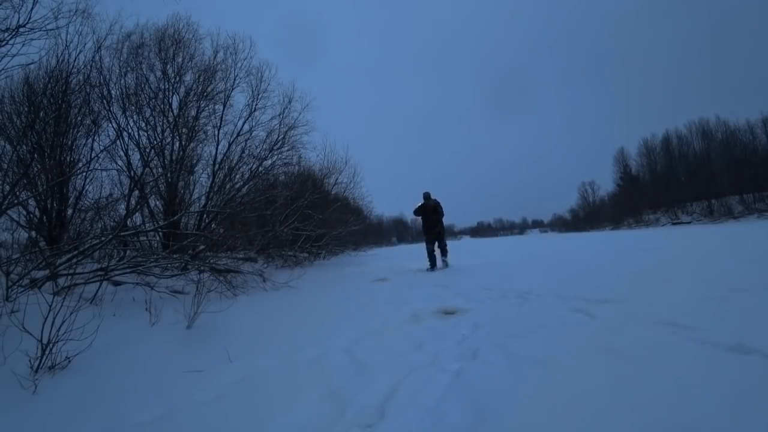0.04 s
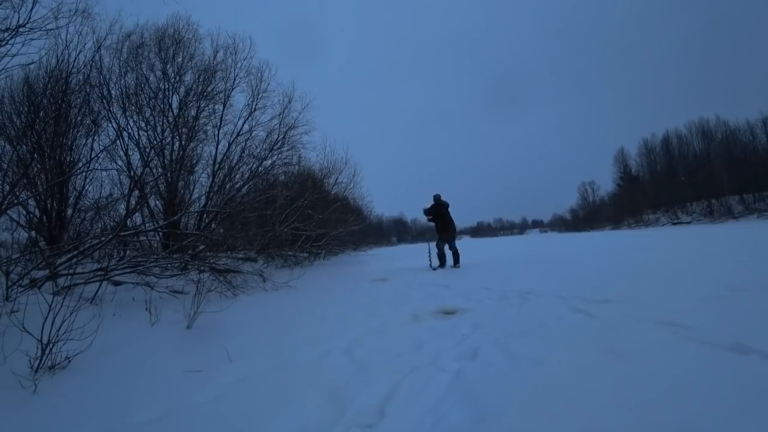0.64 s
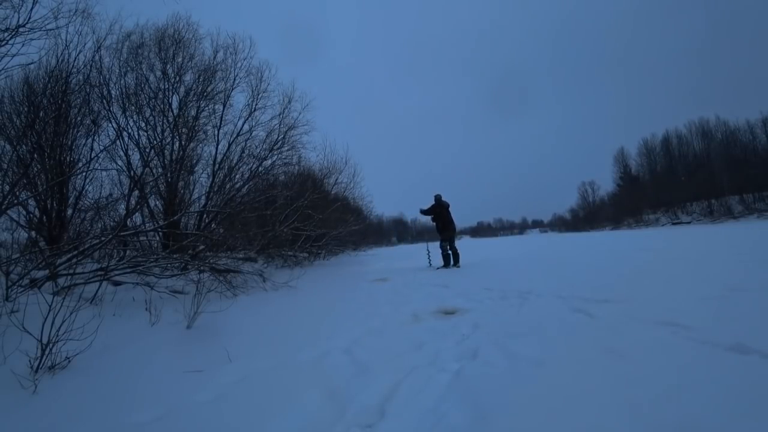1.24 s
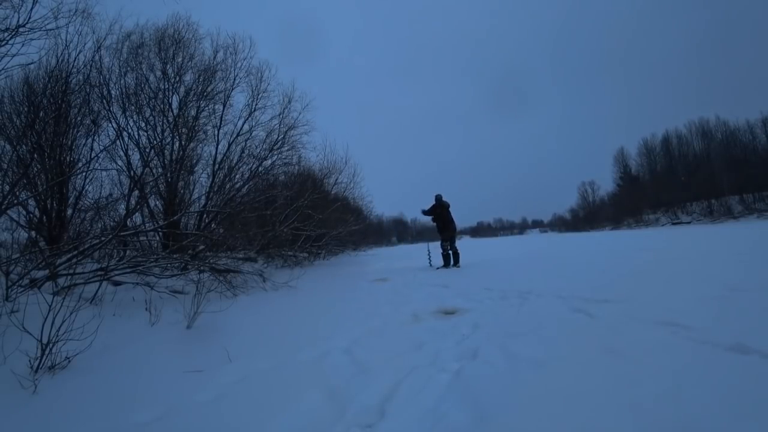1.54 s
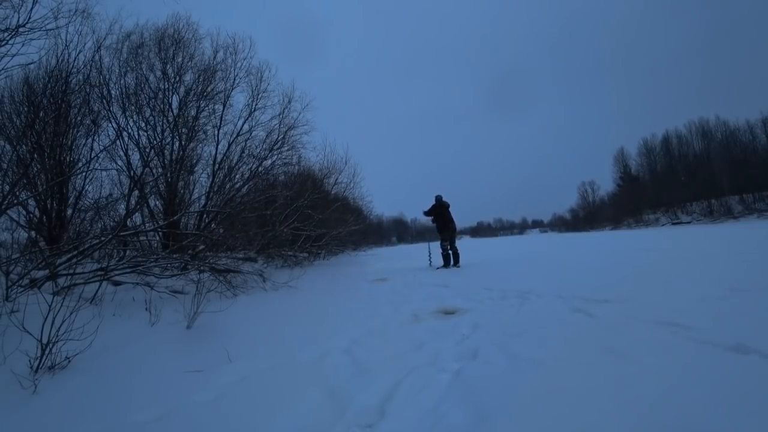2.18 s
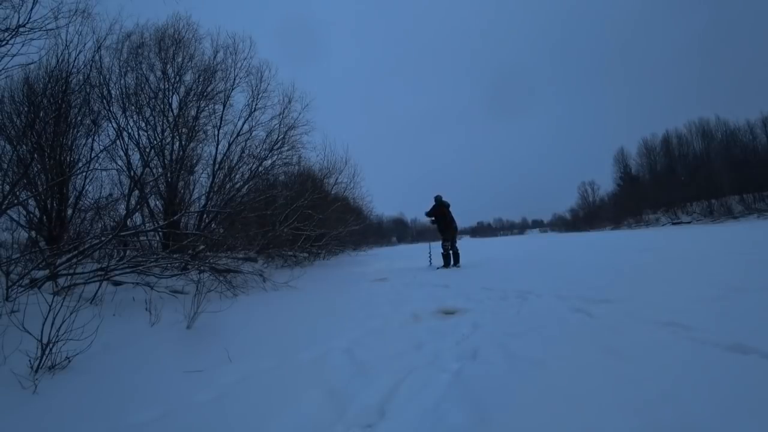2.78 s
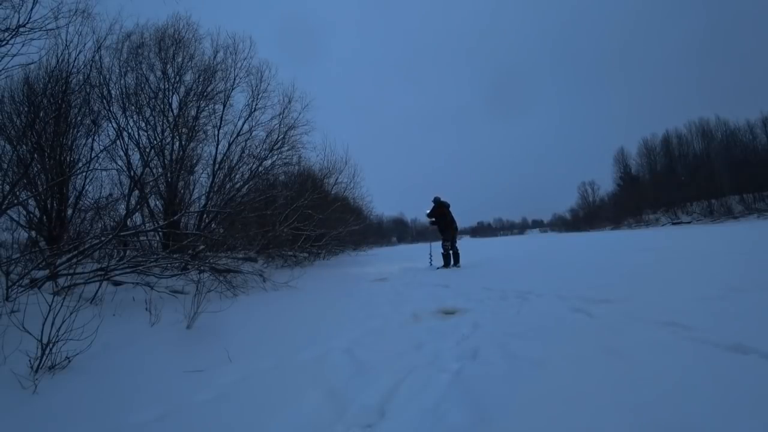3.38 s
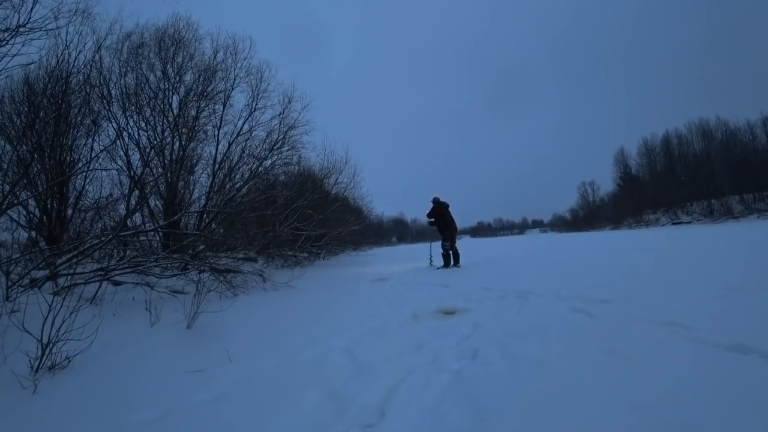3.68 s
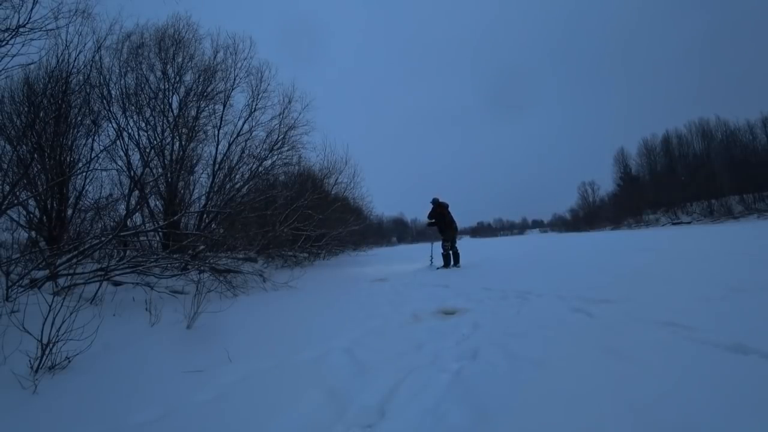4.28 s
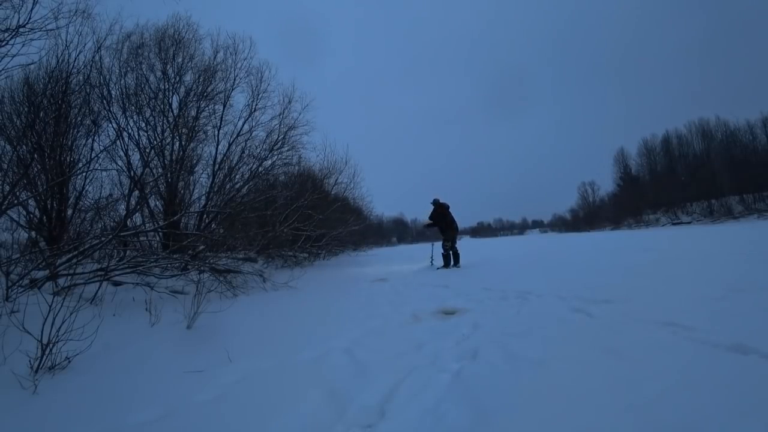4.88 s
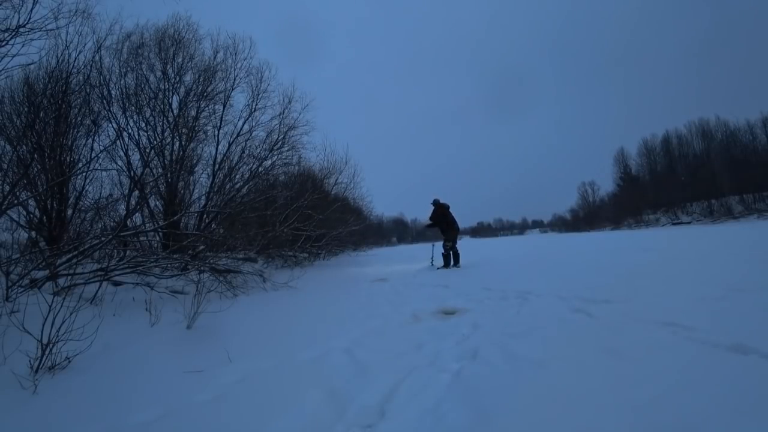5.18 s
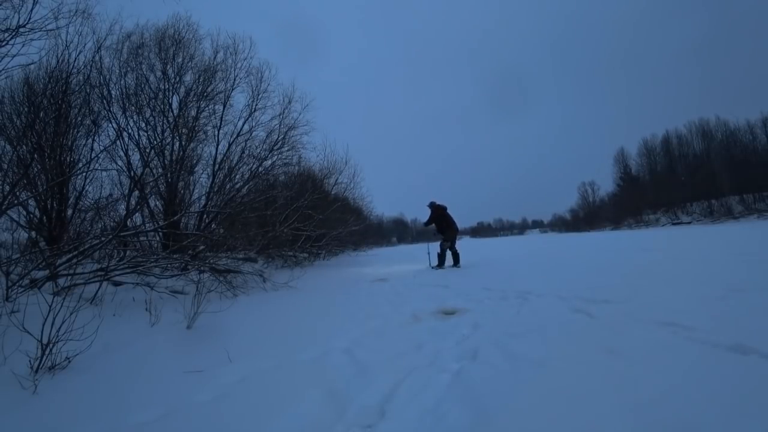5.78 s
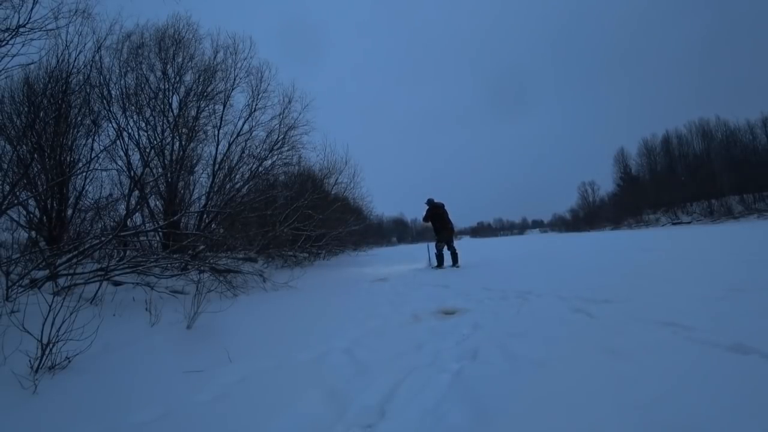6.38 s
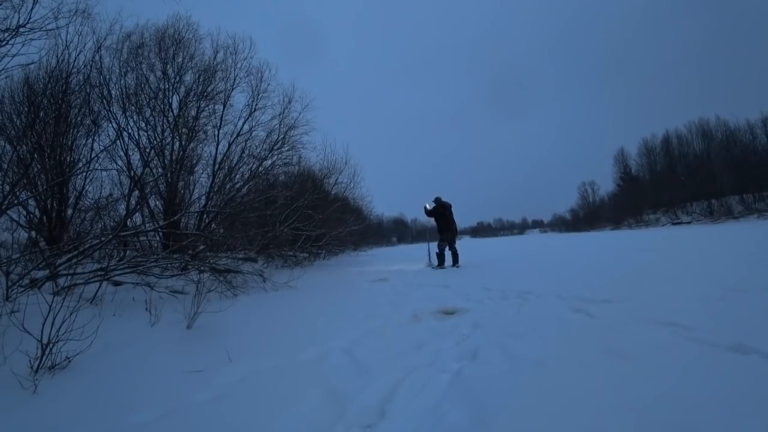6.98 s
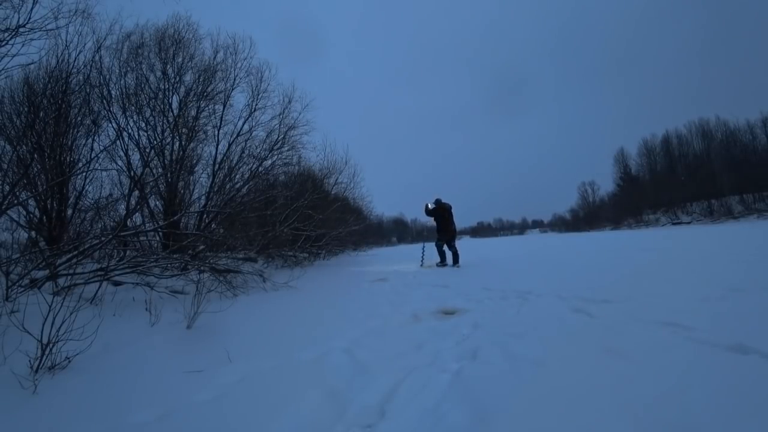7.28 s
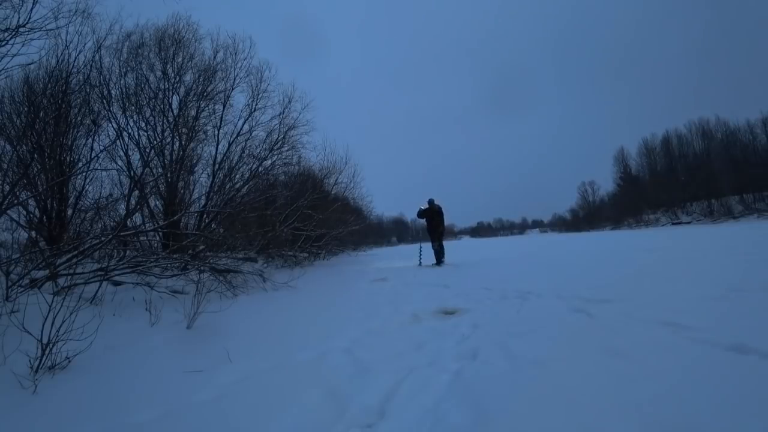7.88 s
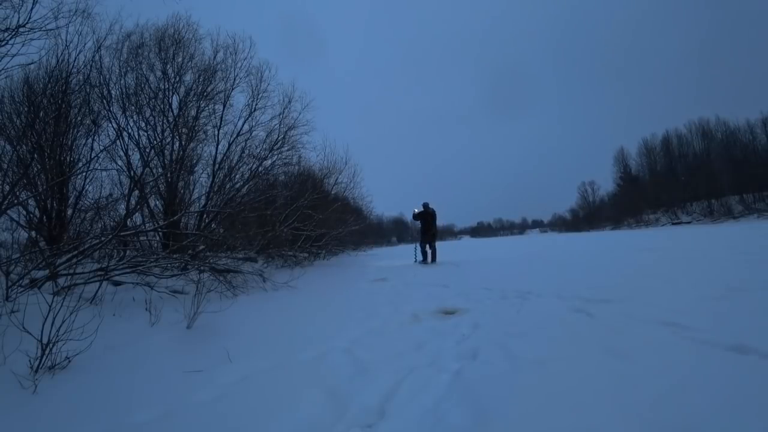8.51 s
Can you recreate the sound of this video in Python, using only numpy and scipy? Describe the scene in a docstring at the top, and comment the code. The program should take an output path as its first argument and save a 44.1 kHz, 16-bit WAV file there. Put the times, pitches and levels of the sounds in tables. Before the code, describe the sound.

Outdoors in still winter air, a hand-cranked ice drill builds into even, gritty scraping, a little to the right and several metres from the microphone. Its steel rings and the ice hums beneath. After about five seconds the cranking ends, and the blade crunches and squeaks through slush in the hole with small watery plops. Metal ticks lightly and boots thud softly in the snow over a faint hush.

```python
"""A hand auger, a big crank drill, bores through river ice some metres away on a still, snowy day.
Its blades bite twice in every turn, chipping the ice in clusters of tiny cracks that ring the steel
and make the ice sheet thrum. Then the turning stops: the auger crunches through wet chips in its hole,
its edge squeals, water plops, metal ticks and boots thud in the snow. Behind it all is a faint hush."""
import sys
import numpy as np
from scipy import signal
from scipy.fft import rfft, irfft, next_fast_len
from scipy.io import wavfile

SR = 44100
rng = np.random.default_rng(int(sys.argv[2]) if len(sys.argv) > 2 else 0)


def inscribe(sig):
    """Save sig as 16-bit PCM at rate SR to the path in sys.argv[1].

    A 1-D sig is mono; a 2-D sig holds one channel per row.
    Samples are clipped to [-1, 1] before scaling.
    """
    pcm = np.round(np.clip(np.atleast_2d(sig).T, -1, 1) * 32767)
    wavfile.write(sys.argv[1], SR, pcm.astype(np.int16))


N = 385698
T = np.arange(N) / SR

# the drilling builds up, holds and stops (time [s], scraping level [dB], ice thrum level [dB])
EFFORT = [(0, -82, -72), (.22, -72, -81), (.36, -58, -61), (.56, -38, -54.5), (.85, -32.5, -50.5),
          (1.4, -34, -48), (3.3, -33, -48.5), (4.85, -34, -47), (5.53, -40.5, -50), (5.58, -58, -55),
          (5.8, -70, -67.5), (5.9, -59, -63), (6.5, -64, -61.5), (6.95, -53, -51), (7.05, -58, -87),
          (7.33, -56, -77), (7.44, -65.5, -79.5), (7.75, -74, -85)]
# turns of the crank (time of the main bite [s], scraping above the effort [dB],
# blade ring above the scraping [dB], dip as the arm goes slack [dB])
CRANK_TURNS = [(.45, 2.5, -10.5, 2), (.706, 1, -8, 4), (1.05, 1, -7.5, 1), (1.401, .5, -6, -3),
               (1.718, 0, -5.5, -0.5), (2.06, .5, -7, -2), (2.395, 0.5, -9, 1), (2.702, -.5, -8.5, 1.5),
               (2.995, 1.5, -11, 2), (3.312, 0.5, -10, 3), (3.615, 1, -9, -1), (3.925, -1, -8, -1),
               (4.238, -0.5, -11.5, -0.5), (4.55, -1.5, -14.5, 2.5), (4.86, 0, -12, 4),
               (5.171, 1, -12.5, 6.5), (5.492, 2.5, -11, 0)]
# pressed into the ice the shaft rings; lifted free it stirs the chips
# (time [s], shaft gain [dB], loose chip gain [dB])
GRIP = [(0, -8, -30), (.7, -8.5, -42), (1.5, -1, -28), (3, -2.5, -22), (4.5, 0, -20), (5.3, 2.5, -10),
        (5.45, -7, -10), (6.08, 1, -2), (6.25, -0.5, -5), (6.55, -3.5, -5.5), (6.95, 1.5, -7),
        (7.2, -25, -4), (7.7, -14, -8)]
# the auger is pumped through wet chips (middle time [s], scraping [dB], thrum [dB], length [s])
PUMP_STROKES = [(5.93, -48, -50.5, 0.11), (6.14, -47, -44.5, 0.11), (6.36, -45.5, -44.5, 0.13),
                (6.606, -39.5, -50, 0.089), (6.85, -48.5, -52.5, 0.15)]
# the biggest chunks of ice give way (middle time [s], level [dB], length [s])
CRUNCHES = [(.467, -39, 0.0056), (.56, -35, 0.016), (1.426, -42, 0.024), (3.172, -28.5, 0.02),
            (4.866, -46, 0.037), (5.37, -33.5, 0.036), (5.498, -29.5, 0.014), (5.532, -30.5, 0.01),
            (5.938, -38.5, .008), (6.116, -40, 0.017), (6.165, -38, .013), (6.195, -40, 0.013),
            (6.26, -40.5, 0.0065), (6.3, -36, 0.0097), (6.316, -33, 0.0033), (6.348, -36, 0.0059),
            (6.369, -29, .012), (6.399, -33, .0052), (6.42, -33.5, 0.0057), (6.436, -35, 0.023),
            (6.567, -34.5, 0.0053), (6.604, -25.5, 0.0059), (6.627, -31, 0.0074), (6.675, -37, 0.0098),
            (6.724, -39.5, 0.013), (6.843, -41.5, .01), (6.886, -35.5, .013), (6.925, -39.5, 0.012),
            (6.961, -42.5, 0.0072)]
# the edge squeals along the wall of the hole (middle time [s], level [dB], length [s])
SQUEALS = [(5.34, -45, 0.091), (5.5, -50, 0.045), (5.96, -61.5, 0.11), (6.178, -40.5, 0.045),
           (6.275, -53, 0.04), (6.41, -51, 0.057)]
# light taps on metal (time [s], level [dB])
TICKS = [(7.3324, -39), (7.469, -34.5)]
# water plops among the chips (time [s], starting pitch [Hz], level [dB])
PLOPS = [(5.928, 294, -37), (6.135, 376, -34.5), (6.173, 1115, -35.5), (6.313, 1760, -37),
         (6.329, 593, -38), (6.562, 1630, -35), (6.603, 1310, -34), (6.725, 1280, -35), (6.805, 660, -35.5),
         (6.834, 348, -37), (6.882, 816, -37.5), (7.256, 2410, -38)]
# auger and boots thud on the snowy ice (middle time [s], level [dB], length [s])
THUDS = [(.382, -51.5, 0.015), (4.878, -41.5, 0.014), (5.431, -43, .03), (5.511, -47.5, 0.035),
         (5.72, -54, .12), (5.934, -37, 0.017), (6.132, -35, 0.011), (6.349, -41.5, .032),
         (6.411, -43, .038), (6.727, -46.5, 0.037), (7.343, -51, .0078), (7.442, -45, 0.021),
         (7.567, -56, 0.041), (7.635, -55.5, 0.014), (7.994, -48, 0.0093), (8.063, -54.5, 0.012),
         (8.175, -57, 0.081), (8.69, -63, 0.11)]

# ringing notes of the long shaft and its spiral (pitch [Hz], width [Hz], gain [dB])
SHAFT_NOTES = [(285.5, 10, 3), (365, 25, 2), (427.4, 21.5, 3.5), (662.5, 15, 0.5), (872.3, 10, 5.5),
               (1046, 45, -2.5), (1175, 55, 1), (1239, 25.5, 5), (1677, 155, 0), (2236, 39, 1),
               (3310, 38, -10), (3486, 34, -0.5), (3990, 75, -2.5), (4260, 38, -4), (5210, 70, -4),
               (5444, 130, 1), (5950, 180, -1), (6306, 127, 5.5), (7200, 63, -2), (7320, 79, -2),
               (7500, 82, 2.5), (7600, 160, 2.5), (8600, 150, -3.5), (9400, 370, -2)]
# ringing notes of the cutting blades (pitch [Hz], width [Hz], gain [dB])
BLADE_NOTES = [(2436, 27, -7.5), (2700, 20, -13), (2617, 79, -1), (2690, 28, -9), (2830, 64, -4.5)]
# ringing notes of the thin edge, which sings at any touch (pitch [Hz], width [Hz], gain [dB])
EDGE_NOTES = [(9660, 45, 0), (9790, 120, -5)]

# tone of breaking ice (frequency [Hz], gain [dB])
BREAKING_TONE = [(200, -16), (400, -8.5), (560, -12.5), (800, -15.5), (1100, -8), (2000, -8), (3150, -6),
                 (3700, -3.5), (4250, -6), (4520, -6.5), (5500, -2), (7000, 2), (8200, -1.5), (10000, -1),
                 (11000, -0.5)]
# tone of loose chips knocking together (frequency [Hz], gain [dB])
LOOSE_CHIP_TONE = [(700, -4), (1400, -0.5), (2500, 3.5), (3700, -1), (5500, 0), (11000, -29)]
# tone of the ice sheet under its snow (frequency [Hz], gain [dB])
SHEET_TONE = [(30, -38), (90, -17), (122, -4), (155, 2), (210, -0.5), (260, -9.5), (380, -14), (600, -15.5),
              (1200, -19)]
# tone of snow packed under a weight (frequency [Hz], gain [dB])
SNOW_TONE = [(30, -22), (85, -15.5), (128, -0.5), (190, 3), (280, -9.5), (440, -19.5), (1000, -23),
             (2000, -50)]
# tone of the open air (frequency [Hz], gain [dB])
AIR_TONE = [(15, -34), (25, -1), (32, -1.5), (182, -6), (260, -10), (518, -14.5), (778, -15.5), (907, -17),
            (979, -15), (1300, -18), (1430, -18.5), (2850, -24), (5260, -27.5), (11000, -20.5),
            (14300, -47), (22000, -120)]
# how unlike the hush is at the two ears (frequency [Hz], gain [dB])
AIR_WIDTH = [(40, -13), (150, -7), (500, 8.5), (2000, 9.5), (11000, -0.5)]
# tone of the echo from the snowy bank and trees (frequency [Hz], gain [dB])
ECHO_TONE = [(60, -17), (150, -17), (300, -11), (600, -6.5), (1200, -5), (2600, -9.5), (5500, -12.5),
             (11000, -17.5)]

# in each turn the arm pushes, pulls, then goes slack (places and widths in shares of a turn)
PUSH_AT, PULL_AT, BITE_WIDTH = 0, 0.41, 0.22
SLACK_AT, SLACK_WIDTH = 0.767, 0.12
PULL_LATE, SETTLE_TURNS = 0.33, 1.3  # the first pulls come late, until the arm finds its rhythm
BREAKS_AT, BREAK_WIDTH, BREAK_DB = (0.083, 0.44), 0.077, -0.4  # the ice gives way after each bite
# the ring of the steel at each bite and between bites
PUSH_BLADES_DB, PULL_BLADES_DB, BETWEEN_BLADES_DB = 6.5, 2.5, -3
PUSH_SHAFT_DB, PULL_SHAFT_DB, BETWEEN_SHAFT_DB = 3.5, 1.5, -2
ROUGH_ICE_DB, ROUGH_THRUM_DB = 0.22, 1.5  # uneven ice makes scraping and thrum waver
TOP_HZ = 11000


def auger(scrape_db):
    """The blades catch and slip; each catch sheds bits of ice and rings the shaft, blades and edge."""
    shaft_db, loose_db = curves(GRIP)
    turned, turn_db, ring_db, slack_db = crank()
    pull_at = PULL_AT + PULL_LATE * np.exp(-np.maximum(turned, 1) / SETTLE_TURNS)
    push, pull = each_turn(turned, PUSH_AT, BITE_WIDTH), each_turn(turned, pull_at, BITE_WIDTH)
    breaks = sum(each_turn(turned, at, BREAK_WIDTH) for at in BREAKS_AT)
    cut_db = scrape_db + turn_db - slack_db * each_turn(turned, SLACK_AT, SLACK_WIDTH)
    pumping = swells([(s, db, length) for s, db, _, length in PUMP_STROKES], rise=0.37, fall=0.59)
    crunching = swells(CRUNCHES, rise=0.25, fall=0.38)
    # hypot adds two levels the way unrelated sounds add up
    scraping = np.hypot(gain(cut_db + BREAK_DB * breaks), pumping)
    scraping *= normalise(gain(ROUGH_ICE_DB * wander(rate=37)))
    # the grip on the ice trembles, too fast to hear as single catches
    tremble = normalise(gain(2.1 * wander(rate=150) + .5 * wander(rate=45)))
    force = np.hypot(scraping * tremble, crunching)
    ice = force * ice_bits(loose_db)
    shaft_bite_db = BETWEEN_SHAFT_DB + PUSH_SHAFT_DB * push + PULL_SHAFT_DB * pull
    shaft = steel_ring(force * gain(shaft_db + shaft_bite_db), SHAFT_NOTES, rate=7000, flicker_db=3)
    # the blades chatter most at each bite; pumping and crunching jar them too
    blade_bite_db = BETWEEN_BLADES_DB + PUSH_BLADES_DB * push + PULL_BLADES_DB * pull
    jarring = gain(-18) * np.hypot(pumping, crunching)
    chatter = np.hypot(gain(cut_db + ring_db + blade_bite_db), jarring)
    blades = steel_ring(chatter * tremble, BLADE_NOTES, rate=3000, flicker_db=1.5)
    squeal = np.hypot(gain(-15) * force, swells(SQUEALS, rise=0.38, fall=0.24))
    edge = steel_ring(squeal, EDGE_NOTES, rate=4000, flicker_db=2)
    return ice + gain(-3.5) * shaft + blades + edge


def crank():
    """The turns made so far, with their scraping, ring and slack in dB; all hold once the crank stops."""
    times, scrape_db, ring_db, slack_db = np.transpose(CRANK_TURNS)
    turn_s, count = np.mean(np.diff(times)), len(times)
    start, stop = times[0] - turn_s / 2, times[-1] + turn_s / 4
    turned = np.interp(T, [start, *times, stop], [-.5, *range(count), count - .75])
    this_turn = np.clip(turned.astype(int), 0, count - 1)
    return turned, np.interp(T, times, scrape_db), np.interp(T, times, ring_db), slack_db[this_turn]


def each_turn(turned, at, width):
    """A smooth bump of height 1 each time the crank passes the place `at`."""
    away = (turned - at + .5) % 1 - .5
    return .5 ** ((2 * away / width) ** 2)


def ice_bits(loose_db):
    """Fine grit crackles, fresh chips snap off and loose ones knock together."""
    grit = normalise(colour(cracks(rate=14000, spread_db=2), BREAKING_TONE))
    fresh = normalise(colour(clinks(count=13000, ring_s=0.038, spread_db=3.5), BREAKING_TONE))
    loose = normalise(colour(clinks(count=18000, ring_s=0.004, spread_db=1.7), LOOSE_CHIP_TONE))
    return gain(-4.5) * grit + gain(-6) * fresh + gain(loose_db) * loose


def cracks(rate, spread_db):
    """Tiny cracks click at random, about `rate` a second, a few much louder than the rest."""
    chance = rng.random(N)
    hit = chance < rate / SR
    size = np.resize(rng.standard_normal(N // 4), hit.sum())
    direction = np.sign(chance[hit] - .5 * rate / SR)
    out = np.zeros(N)
    out[hit] = direction * gain(spread_db * np.clip(size, -2.5, 2.5))
    return normalise(out)


def clinks(count, ring_s, spread_db):
    """Chips of ice each clink briefly at their own pitch, faded out within 25 ms."""
    when, pitch, size = rng.random((count, 3)).T[:, :, None]
    age = np.arange(SR // 40)  # in samples
    hz = 700 + 10300 * pitch
    strength = gain(spread_db * np.minimum(-np.log(1 - size), 3.5))  # heavy chips are rare
    clink = strength * np.exp(-age / (ring_s * SR)) * np.sin(2 * np.pi * hz * age / SR)
    faded = clink * (1 - age / len(age))
    places = (when * N).astype(int) + age
    return normalise(np.bincount(places.ravel(), faded.ravel(), N)[:N])


def steel_ring(force, notes, rate, flicker_db):
    """Cracks strike each note of the steel, which rings and fades; the level follows the force."""
    out, power = 0, 0
    for hz, width, db in notes:
        b, a = signal.iirpeak(hz, hz / width, fs=SR)
        # the point of contact wanders, so each note is struck unevenly
        strikes = normalise(cracks(rate, spread_db=1.5) * gain(flicker_db * wander(rate=45)))
        out = out + gain(db) * signal.lfilter(b, a, force * strikes)
        power += gain(db) ** 2 * np.pi * width / SR
    return out / np.sqrt(power)


def ticks():
    """Something light and hard taps the steel: each tap is a tiny burst of bright noise."""
    out = np.zeros(N)
    age = np.arange(SR // 20) / SR
    for s, db in TICKS:
        tap = rng.standard_normal(len(age)) * np.exp(-age / 0.0027)
        start = int(s * SR)
        out[start:start + len(tap)] += gain(db - 4) * tap
    return colour(out, [(500, -11), (1800, -1), (3500, -9), (7000, 6.5), (11000, -2)])


def plops(cycles, glide):
    """Small air pockets ring in the water, rising in pitch as they fade."""
    out = np.zeros(N)
    age = np.arange(SR // 10) / SR
    for s, hz, db in PLOPS:
        fade = age * hz / cycles
        loudness = (1 - np.exp(-6 * fade)) * np.exp(-fade)
        phase = 2 * np.pi * hz * age * (1 + glide * np.minimum(fade, 6))
        start = int(s * SR)
        out[start:start + len(age)] += gain(db) * loudness * np.sin(phase)
    return out


def ice_sheet(thrum_db):
    """Jolts from the auger boom briefly in the sheet of ice."""
    pumping = swells([(s, db, length) for s, _, db, length in PUMP_STROKES], rise=0.43, fall=0.35)
    jolts = np.hypot(gain(thrum_db), pumping) * normalise(gain(ROUGH_THRUM_DB * wander(rate=22)))
    return jolts * normalise(colour(cracks(rate=600, spread_db=2), SHEET_TONE))


def snow_thuds():
    """Boots and auger pack the snow in short, low thuds; the snow muffles their treble."""
    noise = normalise(colour(rng.standard_normal(N), SNOW_TONE))
    rumble = signal.hilbert(noise, next_fast_len(N))[:N]
    even_rumble = normalise(rumble.real / (np.abs(rumble) + .4))  # abs is the loudness at each moment
    thuds = swells(THUDS, rise=0.32, fall=0.58) * even_rumble
    return gain(-2) * colour(thuds, [(50, -11), (120, 0), (300, -2.5), (1000, -7), (3000, -30)])


def outdoors(sound, left_db, right_db):
    """Direct sound plus a short, soft echo from snow and bank, with a level for each ear."""
    age = np.arange(SR // 3) / SR
    decay = np.exp(-age / 0.0046) + gain(-23) * np.exp(-age / 0.11)
    echo = 0
    for _ in range(4):
        path = rng.standard_normal(len(age)) * decay / np.sqrt(np.sum(decay ** 2))
        share = 0.65 + 0.66 * wander(rate=25)  # the moving auger shifts its sound between the paths
        echo = echo + share * signal.oaconvolve(sound, path)[:N] / 2
    echo = colour(echo, ECHO_TONE)
    # the echo arrives from the side, so the two ears get it with opposite signs
    return np.array([sound + echo, sound - echo]) * gain([[left_db], [right_db]])


def air():
    """A quiet hush that wavers; its bass is alike at both ears."""
    middle, side = (normalise(colour(rng.standard_normal(N), AIR_TONE)) for _ in range(2))
    side = colour(side, AIR_WIDTH)
    return gain(-65.5 + 0.31 * wander(rate=4.3)) * np.array([middle + side, middle - side])


def gain(db):
    """Turn decibels into a number to multiply by."""
    return 10 ** (np.asarray(db) / 20)


def normalise(x):
    """Scale to an average strength (rms) of 1."""
    return x / np.sqrt(np.mean(x ** 2))


def curves(table):
    """Join the rows of a timed table with straight lines, one curve for each level column."""
    times, *columns = np.transpose(table)
    return [np.interp(T, times, column) for column in columns]


def wander(rate):
    """A random drift that heads for a new value `rate` times a second."""
    targets = rng.uniform(-0.8, 1, N // 100)
    return normalise(np.interp(T * rate, np.arange(len(targets)), targets))


def colour(sound, tone):
    """Shape bass and treble along a curve of (frequency [Hz], gain [dB]) points."""
    hz, db = np.transpose(tone)
    size = next_fast_len(sound.shape[-1] + 2048)
    freqs = np.maximum(np.arange(size // 2 + 1) * SR / size, 1)
    gains = gain(np.interp(np.log(freqs), np.log(hz), db))
    return irfft(rfft(sound, size) * gains, size)[..., :sound.shape[-1]]


def swells(table, rise, fall):
    """Loudness of short events that build and die away; rise and fall are shares of their length."""
    power = np.zeros(N)
    for s, db, length in table:
        near = slice(max(int((s - 4 * length) * SR), 0), int((s + 4 * length) * SR))
        past_peak = (T[near] - s) / length + (fall - rise) / 2
        width = np.where(past_peak < 0, rise, fall)
        power[near] += gain(db) ** 2 * .5 ** ((past_peak / width) ** 2)
    return np.sqrt(power)


def scene():
    """Auger, water, ice and snow, slightly to the right, in the open air."""
    scrape_db, thrum_db = curves(EFFORT)
    hole = auger(scrape_db) + ticks() + plops(cycles=4.7, glide=0.017)
    hole = outdoors(hole, left_db=-1.9, right_db=1.07)
    underfoot = outdoors(ice_sheet(thrum_db) + snow_thuds(), left_db=3, right_db=4)
    return hole + underfoot + air()


def record(dry):
    """A steep filter cuts the treble above TOP_HZ."""
    return signal.sosfilt(signal.ellip(12, .2, 70, TOP_HZ, fs=SR, output="sos"), dry)


dry = scene()
out = record(dry)
inscribe(out)
```